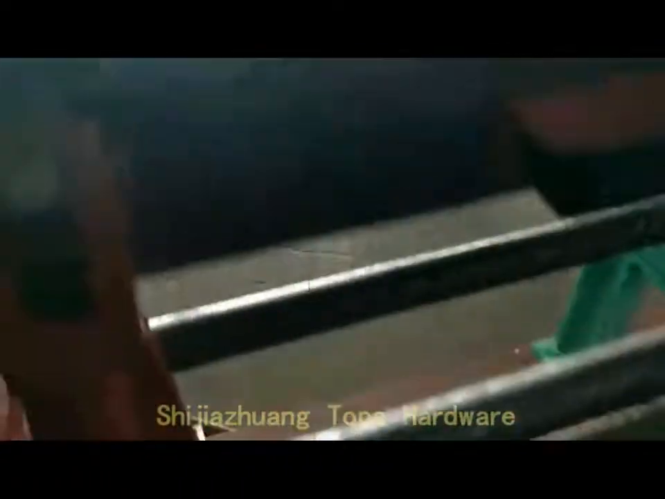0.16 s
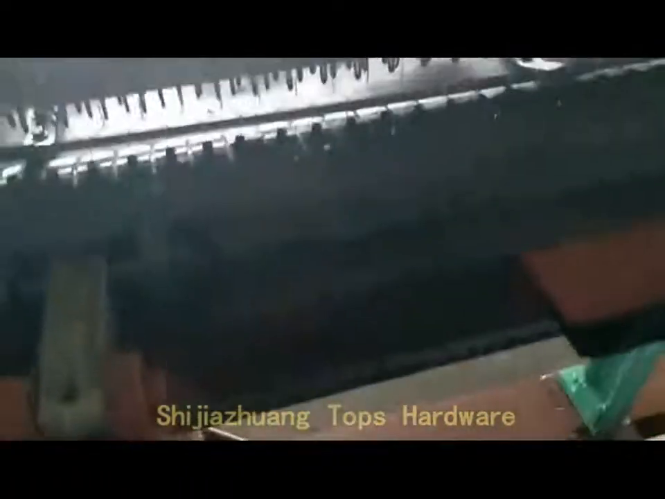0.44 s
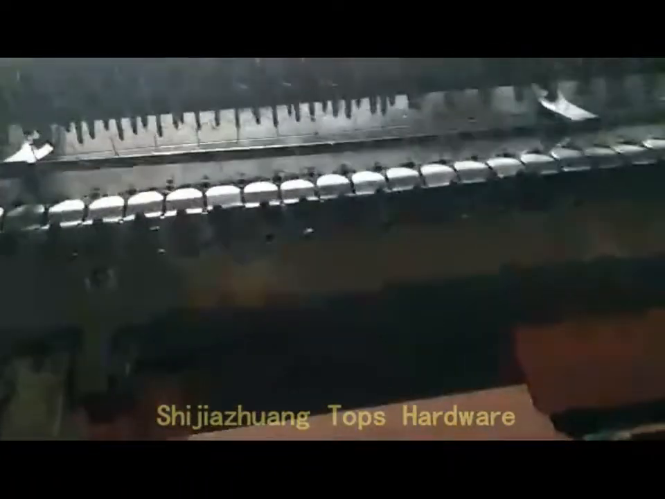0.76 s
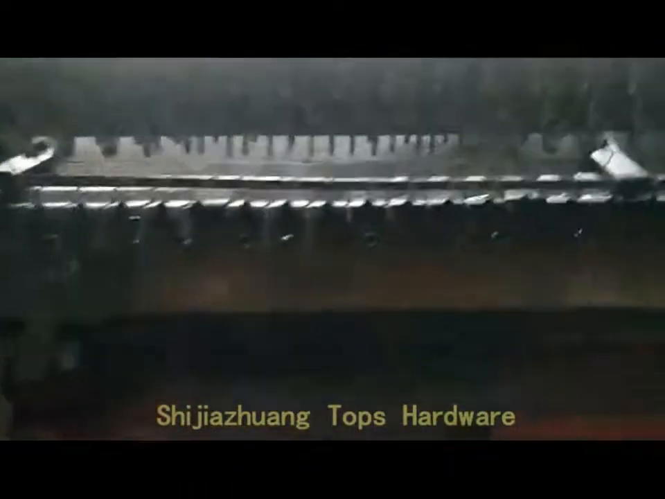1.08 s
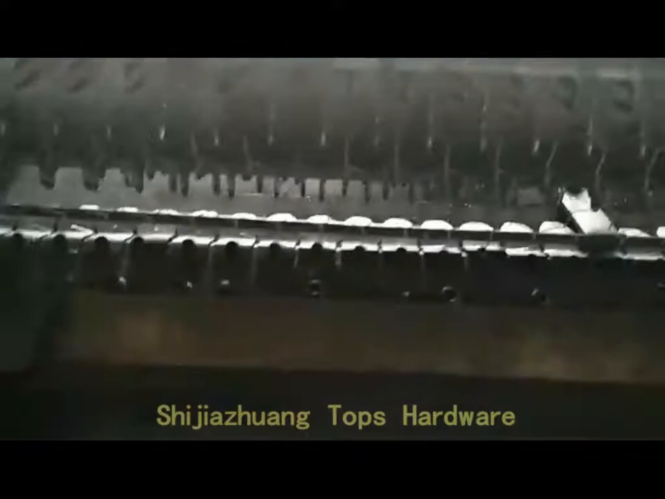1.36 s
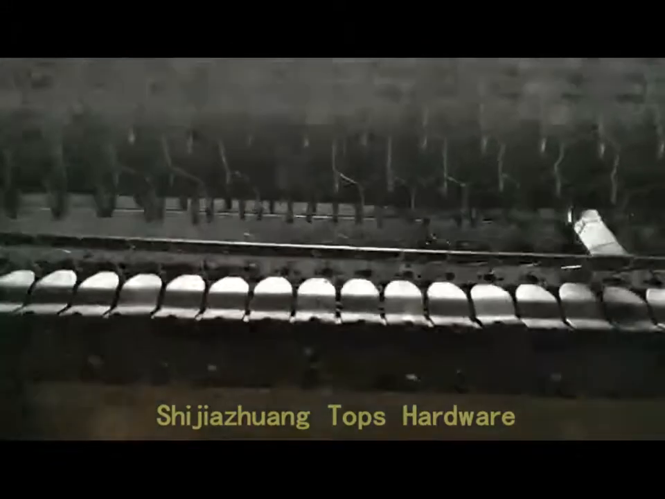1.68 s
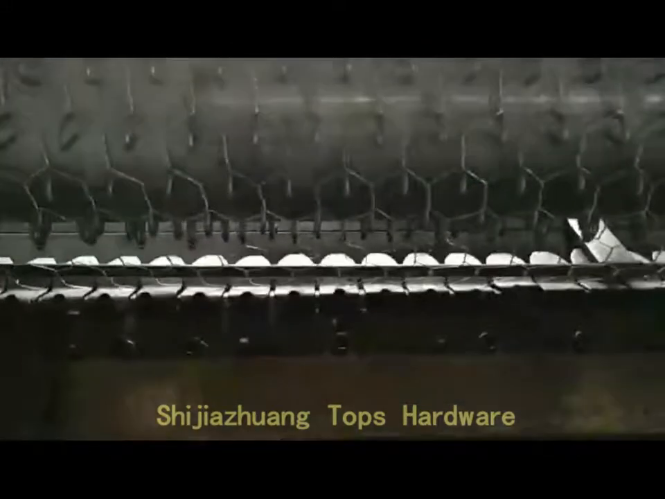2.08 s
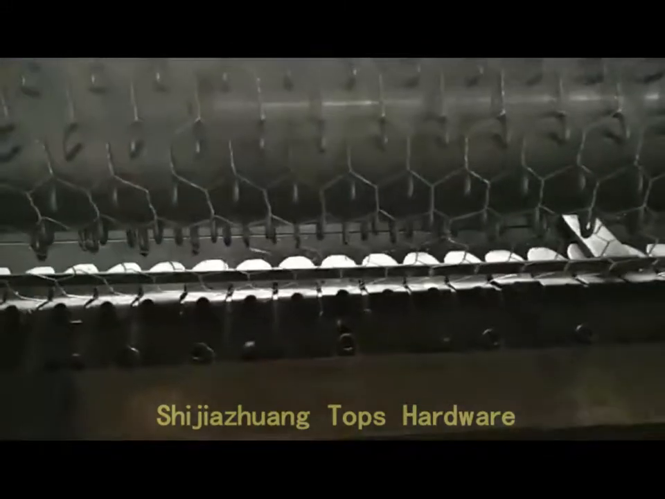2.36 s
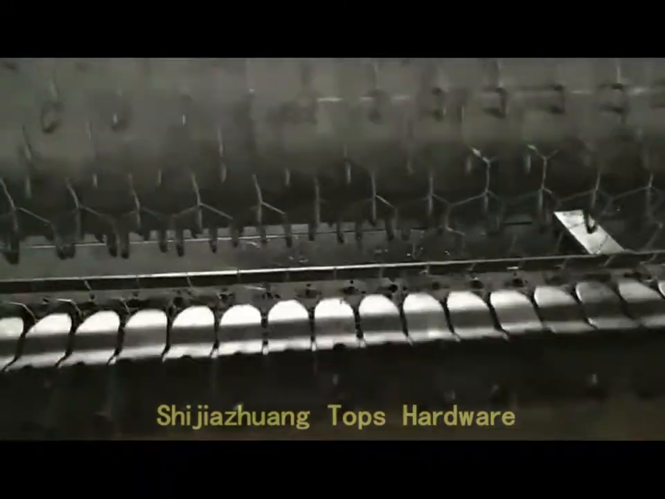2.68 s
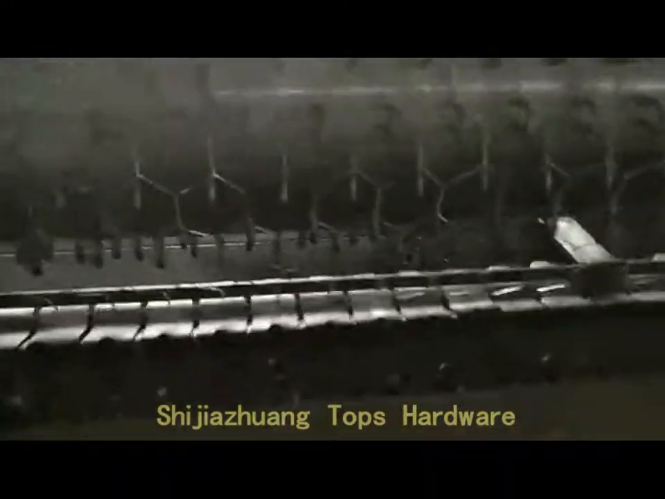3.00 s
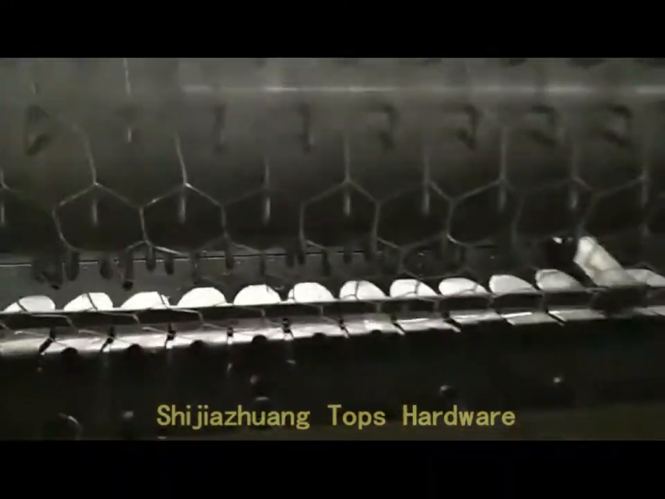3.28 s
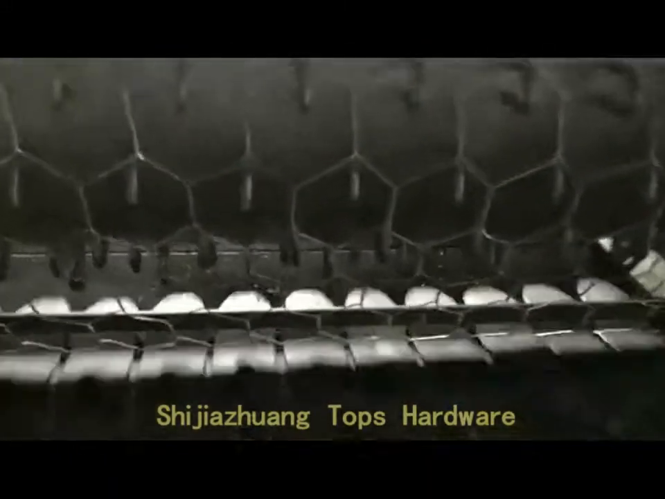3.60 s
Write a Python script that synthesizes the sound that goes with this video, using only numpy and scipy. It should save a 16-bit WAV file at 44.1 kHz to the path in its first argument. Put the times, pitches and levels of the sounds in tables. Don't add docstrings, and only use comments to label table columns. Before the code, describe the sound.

Wire netting machine clatters in rhythmic rounds, metal teeth rattling, a latch slamming over frame rumble

```python
import sys
import numpy as np
from scipy import signal
from scipy.io import wavfile

SR = 44100
rng = np.random.default_rng(int(sys.argv[2]) if len(sys.argv) > 2 else 0)


def volts(x):
    e = np.asarray(x, float) / 20
    return 10 ** e


def digitize_waveform(pressure):
    field = np.atleast_2d(pressure).T
    bounded = np.clip(field, -1, 1)
    quanta = np.round(bounded * 32767).astype(np.int16)
    wavfile.write(sys.argv[1], SR, quanta)


N = 164934

# (start [s], length [s], level at start [dB], level at end [dB], rack against teeth [dB])
STROKES = [(0.0, 0.097, -24, -20, 11), (0.118, 0.33, -13, -17, 3.5), (0.39, 0.13, -14, -16.5, 0),
           (0.612, 0.081, -20, -18, -0.5), (1.015, 0.044, -38, -25, -34), (1.148, 0.29, -15, -10.5, -1.5),
           (1.513, 0.18, -10, -32, -8), (1.656, 0.099, -18.5, -20, -5), (2.042, 0.077, -21.5, -9, -1),
           (2.18, 0.33, -14, -8.5, -1.5), (2.555, 0.23, -9.5, -19, -20), (2.729, 0.05, -11, -21, -3),
           (3.091, 0.071, -29.5, -11, -4), (3.238, 0.33, -14, -10.5, -3), (3.557, 0.089, -33, -10.5, -6)]
# (pitch [Hz], width [Hz], level [dB])
TEETH = [(4700, 130, -15), (4970, 390, 4), (5233, 110, -1), (5793, 510, 6.5), (6580, 1600, -10)]
# (pitch [Hz], width [Hz], level [dB])
RACK = [(1120, 520, -1), (1640, 170, -6), (1930, 240, 4.5), (2360, 144, -0.5), (2595, 260, -5.5)]
# (time [s], level [dB])
GUIDE = [(0, -11), (.4, -12), (1.3, -10.5), (2.0, -17.5), (3.74, -17)]
# (time [s], level [dB])
AIR = [(.65, -38), (.85, -31), (1.13, -27), (1.5, -35)]
# (time [s], peak level [dB], pitch [Hz])
SNAPS = [(0.1003, -7.5, 6200), (0.6553, -10.5, 4880), (0.7637, -22, 4450), (1.149, -11.5, 6050),
         (1.1603, -5, 5550), (1.1867, -6, 5740), (1.212, -10, 5730), (1.233, -17, 5560),
         (1.3667, -11, 4940), (1.434, -6, 5830), (1.6979, -10, 4800), (2.073, -12, 5900),
         (2.1905, -12, 4850), (2.2026, -3.5, 5070), (2.319, -5.5, 4970), (2.335, -9, 5160),
         (2.358, -6, 4950), (2.586, -11, 4570), (2.716, -10, 4900), (2.748, -5.5, 5010), (3.2367, -5, 5500),
         (3.2475, -4, 5770), (3.3005, -2.5, 5340), (3.3436, -9.5, 5200), (3.4729, -11.5, 5400),
         (3.5233, -7, 4680)]
# (time [s], peak level [dB])
CLICKS = [(0.1015, -16.5), (0.4, 9), (0.625, -13.5), (1.1533, -10), (1.164, -21), (1.4492, 1.5),
          (1.667, -13.5), (2.2, -12.5), (2.23, -14), (2.4948, 6.5), (2.7127, -23), (3.247, -8),
          (3.5416, 8.5)]
# (pitch [Hz], level [dB], time to fall 60 dB [s])
LATCH = [(3014, -19, 0.015), (6260, -12, 0.013), (7340, -34.5, 0.037), (9090, -13.5, 0.011),
         (9860, -23.5, 0.014), (12120, -6.5, 0.015), (13900, -28, 0.026)]
# (pitch [Hz], width [Hz], level [dB])
LOOSE = [(7430, 150, -4), (8280, 60, -7), (9010, 130, 0), (10100, 150, -9), (11250, 120, -9),
         (11900, 90, -3), (12220, 200, 1), (12900, 100, -9), (13400, 140, -9), (14200, 120, -10),
         (14700, 120, -11), (15250, 150, -12)]
# (time [s], peak level [dB], bass against knock [dB])
KNOCKS = [(0.105, -12, 13.5), (0.501, -19, 19), (0.604, -23, 16), (0.727, -20, -10), (1.147, -20.5, 20),
          (1.712, -23, 16), (1.74, -11, 0), (2.042, -21.5, 11), (2.189, -10.5, 13), (2.574, -16.5, 14),
          (2.784, -12.5, 8.5), (2.845, -14.5, 3), (3.235, -8, 5), (3.3, -19.5, 9), (3.63, -19, 16.5)]
# (pitch [Hz], level per Hz [dB])
KNOCK_COLOUR = [(450, 7.5), (800, -4), (1320, -4.5), (1800, 1), (4000, -25)]
# (time [s], level [dB])
LOAD = [(0, -22), (.35, -22.5), (.55, -20), (.74, -16.5), (.85, -27.5), (1.13, -28), (1.17, -19),
        (1.4, -21), (1.5, -26), (1.801, -18), (1.95, -25), (2.4, -24), (2.7, -18), (3.001, -26),
        (3.22, -25.5), (3.3, -22.5), (3.5, -22.5), (3.6, -23)]
# (pitch [Hz], level per Hz [dB])
RUMBLE_COLOUR = [(25, -56), (50, -5), (119, -3), (300, 0.5), (476, -13), (900, -20.5), (1050, -41),
                 (1500, -22)]
# (pitch [Hz], width [Hz], level [dB])
BEAMS = [(75, 15, -5), (152.8, 9, -5), (189.7, 11, 3), (202.3, 2.9, -11), (231.3, 14.3, -4), (303, 11, -1),
         (345.2, 16, 3.5), (410.7, 5.3, -3.5), (449.5, 37, -1), (795, 96, -1.5)]
# (start [s], length [s], level [dB])
GROANS = [
    (0.095, 0.13, -26.5),
    (1.159, 0.19, -20),
    (2.197, 0.2, -25.5),
    (3.24, 0.27, -18),
]
# (time [s], peak level [dB], pitch [Hz])
JOLTS = [(0.052, -11, 341), (0.107, -4, 314), (0.485, -8, 256), (0.85, -17.5, 186), (0.941, -14.5, 372),
         (1.038, -14.5, 344), (1.153, -6.5, 260), (1.216, -8.5, 168), (1.404, -13, 344), (1.821, -5.5, 346),
         (1.879, -16, 197), (1.916, -8.5, 211), (2.031, -8, 348), (2.085, -8.5, 362), (2.188, -4, 315),
         (2.439, -15, 240), (2.719, -7, 357), (2.782, -4, 321), (2.868, -8, 331), (3.057, -9.5, 202),
         (3.146, -14, 349), (3.24, -14.5, 321), (3.307, -7.5, 214), (3.395, -12, 237), (3.438, -12, 239),
         (3.628, -9, 257),
         (0.603, -13, 867),
    (3.635, -8.5, 568),
]
# (pitch [Hz], likeness [-1 to 1, limited])
LIKENESS = [(40, -0.5), (100, 2), (300, 1), (600, 0.2), (1200, -0.43), (5000, 0.2), (14000, -2)]
# (time [s], left against right [dB])
TURN = [(0, -2), (.4, -1), (.9, -2), (1.2, -1.5), (1.9, -3.5), (2.2, -1), (2.8, -4), (3.15, 2), (3.3, -2),
        (3.74, -1)]
# (time [s], zero swing left [full scale], zero swing right [full scale],
# gain duck left [dB], gain duck right [dB])
OVERLOADS = [
    (0.4, 0.27, 0.2, 2, 3.5),
    (1.45, 0.075, 0.63, 6, 10),
    (2.494, .05, 0.52, 5, 10),
    (3.543, 0.27, .01, 2.5, 2.5),
]


def rms_one(x):
    return x / np.sqrt(np.mean(x ** 2) + 1e-20)


def clock():
    return np.arange(N) / SR


def over_time(points):
    return np.interp(clock(), *np.transpose(points))


def at_hz(points, hz):
    return np.interp(np.log(hz), np.log(np.array(points)[:, 0]), np.array(points)[:, 1])


def drift(rate_hz):
    r = np.exp(-2 * np.pi * rate_hz * 40 / SR)
    steps = rng.standard_normal(N // 40 + 2002)
    slow = signal.lfilter([1], [1, -2 * r, r * r], steps)[2000:]
    return np.interp(np.arange(N) / 40, np.arange(len(slow)), rms_one(slow))


def high_pass(x, order, hz):
    return signal.sosfilt(signal.butter(order, hz, "high", fs=SR, output="sos"), x)


def resonate(x, hz, width_hz):
    r = np.exp(-np.pi * width_hz / SR)
    feedback = [1, -2 * r * np.cos(2 * np.pi * hz / SR), r * r]
    return signal.lfilter([(1 - r * r) / 2, 0, (r * r - 1) / 2], feedback, x + 1e-18)


def pair(source, hz):
    alike = np.clip(at_hz(LIKENESS, hz), -1, 1)
    return np.sqrt(1 + alike) * source[0] + np.sqrt(1 - alike) * source[1] * [[1], [-1]]


def coloured(spectrum, sources, patchy_db, rate_hz):
    lowest, highest = spectrum[0][0], spectrum[-1][0]
    edges = lowest * 2 ** np.arange(0, np.log2(highest / lowest) + .2, 1 / 3)
    out = 0
    for k, (low, high) in enumerate(zip(edges, edges[1:])):
        hz = np.sqrt(low * high)
        band_filter = signal.butter(2, [low, high], "band", fs=SR, output="sos")
        band = signal.sosfilt(band_filter, sources[k % 2])
        level = volts(at_hz(spectrum, hz) + patchy_db * drift(rate_hz))
        out = out + level * pair(band, hz)
    return rms_one(out)


def body(table, sources, patchy_db, rate_hz):
    out = 0
    for k, (hz, width_hz, db) in enumerate(table):
        tone = rms_one(pair(resonate(sources[k % 2], hz, width_hz), hz))
        out = out + (-1) ** k * volts(db + patchy_db * drift(rate_hz)) * tone
    return rms_one(out)


def dying(hits, t60_s):
    kicks = np.zeros(N)
    for s, db in hits:
        kicks[int(s * SR)] += volts(2 * db)
    return np.sqrt(signal.lfilter([1], [1, -volts(-120 / (t60_s * SR))], kicks))


def contacts():
    shape, clicks_per_s = (2, 2, N), 2500
    sizes = volts(0.5 * np.minimum(rng.exponential(1, shape), 5))
    happens = rng.random(shape) < clicks_per_s / SR
    clicks = sizes * rng.choice([-1, 1], shape) * happens
    return rms_one(clicks) + .5 * rng.standard_normal(shape)


def gears():
    rise_s, fall_db_per_s, idle_db = 0.0058, 119, -29
    sizzle_fade_db_per_s, teeth_edge_hz = 42, 6640
    t = clock()
    teeth, rack, fresh = volts(2 * idle_db), volts(2 * idle_db), volts(2 * over_time(AIR))
    for s, length, start_db, end_db, rack_db in STROKES:
        fall_db = fall_db_per_s * np.maximum(t - s - length, 0)
        db = np.interp(t, [s, s + length], [start_db, end_db]) - fall_db
        power = volts(2 * db) * np.clip((t - s) / rise_s, 0, 1) ** 2
        teeth = teeth + power
        rack = rack + power * volts(2 * rack_db)
        fade_db = sizzle_fade_db_per_s * np.maximum(t - s, 0) + fall_db
        fresh = fresh + power * volts(-2 * fade_db)
    chatter, hits = volts(1.02 * drift(23)), contacts()
    ringing = volts(-5.5) * np.sqrt(teeth) * body(TEETH, hits, patchy_db=3.5, rate_hz=6.5)
    ringing += volts(-11.5) * np.sqrt(rack) * body(RACK, hits[::-1], patchy_db=2.0, rate_hz=14)
    guide_hz = 4020
    guide = rms_one(pair(resonate(hits[0], guide_hz, width_hz=460), guide_hz))
    ringing += volts(over_time(GUIDE) + 0.5 * drift(36)) * np.sqrt(rack) * guide
    ringing = signal.sosfilt(signal.butter(10, teeth_edge_hz, fs=SR, output="sos"), ringing)
    sizzle = rms_one(high_pass(hits[0, ::-1], 6, teeth_edge_hz))
    sizzle = volts(-15 + 0.5 * drift(7.3)) * np.sqrt(fresh) * sizzle
    return chatter * (ringing + sizzle)


def snaps():
    peak_s, width_hz = 0.0042, 690
    out, t = np.zeros((2, N)), np.arange(int(.03 * SR)) / SR
    shape = np.sqrt(t / peak_s) * np.exp(.5 - (t / peak_s) ** 2 / 2)
    for s, db, hz in SNAPS:
        noise = rng.standard_normal((2, 2, len(t)))
        tone = rms_one(resonate(resonate(noise[0], hz, width_hz), hz, width_hz))
        edge = volts(-17) * np.diff(noise[1], prepend=0)
        at = int(s * SR)
        out[:, at:at + len(t)] += volts(db - 6.5) * shape * (tone + edge)
    return out


def latch_ring(pan_db):
    bounce_s, bounce_db, contact_s = 0.015, -12, 0.0031
    s, db = np.transpose(CLICKS)
    at = (s * SR).astype(int)
    again = np.array([int((row[0] + bounce_s) * SR) for row in OVERLOADS])
    side = volts(np.outer([.5, -.5], pan_db + rng.normal(0, 14, len(s))))
    luck_db = rng.normal(0, 2.15, (len(s), len(LATCH)))
    step, out = np.arange(int(contact_s * SR)), np.zeros((2, N))
    for k, (hz, level_db, t60_s) in enumerate(LATCH):
        clicks = np.zeros((2, N))
        clicks[:, at] = side * volts(db + level_db + luck_db[:, k])
        bounce = volts(bounce_db + level_db + 8.0 + luck_db[:len(again), -k])
        clicks[:, again] = (hz > 8000) * bounce
        r, w = volts(-60 / (t60_s * SR)), 2 * np.pi * hz / SR
        swelling = signal.lfilter(np.cos(w * step) * 2 / len(step), [1], clicks)
        out += signal.lfilter([0, np.sin(w)], [1, -2 * r * np.cos(w), r * r], swelling + 1e-18)
    return out


def latch_crack(noise):
    loudness = signal.lfilter([.03], [1, -.97], dying(CLICKS, 7 * 0.0026))
    return volts(-4.5) * loudness * high_pass(noise[::-1], 2, 1500)


def loose_parts(noise):
    tail = high_pass(noise, 4, 6800) * volts(-21)
    for hz, width_hz, level_db in LOOSE:
        tail += volts(level_db - 15 + 3.5 * drift(18)) * rms_one(resonate(noise, hz, width_hz))
    swell_s = 0.033
    lag = np.exp(-1 / (swell_s * SR))
    swell = signal.lfilter([1 - lag], [1, -lag], dying(CLICKS, t60_s=0.38))
    return volts(-14 + 2.7 * drift(34)) * swell * tail


def latch():
    pan_db = -3.5
    noise = rng.standard_normal((2, N))
    side = volts([[pan_db / 2], [-pan_db / 2]])
    return latch_ring(pan_db) + side * (latch_crack(noise) + loose_parts(noise))


def knocks(noise):
    hits = [row[:2] for row in KNOCKS]
    loudness = dying(hits, t60_s=0.31) + 2 * dying(hits, t60_s=.03)
    return volts(-9.5) * loudness * coloured(KNOCK_COLOUR, noise, patchy_db=-1.0, rate_hz=15)


def groans():
    start_hz, sag_hz_per_s, wobble_hz = 284.8, 340, 25.2
    t, out = clock(), 0
    for s, length, db in GROANS:
        phase = 2 * np.pi * (start_hz * t - sag_hz_per_s * (t - s) ** 2 / 2)
        shape = np.clip(np.minimum((t - s) / 0.0033, (s + length - t) / 0.01), 0, 1)
        rough = drift(wobble_hz) * np.cos(phase) + drift(wobble_hz) * np.sin(phase)
        out = out + volts(db) * shape * rough
    return out


def jolts():
    rise_s = 0.011
    out, t = np.zeros(N), np.arange(int(.1 * SR)) / SR
    shape = t / rise_s * np.exp(1 - t / rise_s)
    for s, db, hz in JOLTS:
        at = int(s * SR)
        wave = np.sin(2 * np.pi * (hz * t + rng.random()))
        out[at:at + len(t)] += volts(db - 8) * shape * wave
    return out


def frame():
    noise = rng.standard_normal((2, 2, N))
    load = volts(over_time(LOAD) + 1.58 * drift(31))
    thud = dying([(s, db + bass_db - 12.0) for s, db, bass_db in KNOCKS], t60_s=0.45)
    thud = signal.lfilter([.006], [1, -.994], thud)
    rumble = volts(-2.5) * load * coloured(RUMBLE_COLOUR, noise[::-1], patchy_db=0.0, rate_hz=19)
    beams = volts(-1.5) * np.hypot(load, thud) * body(BEAMS, noise, patchy_db=2, rate_hz=9.0)
    return rumble + groans() + jolts() + beams + knocks(noise)


def hall(x):
    t60_s = 0.63
    t = np.arange(SR) / SR
    tail = rng.standard_normal((2, SR)) * volts(-60 * t / t60_s) * (t > .012)
    tail = signal.lfilter([1, -1], np.convolve([1, -.75], [1, -.97]), tail)
    tail = tail / np.sqrt(np.sum(tail ** 2, axis=1, keepdims=True))
    return signal.fftconvolve(x, tail, axes=1)[:, :N]


def scene():
    turn_db = over_time(TURN) * [[.5], [-.5]]
    dry = (gears() + snaps()) * volts(turn_db) + latch()
    dry = dry + frame() * volts(0.33 * turn_db + [[-.3], [.3]])
    return dry + volts(-17.5) * hall(dry)


def band_limit(x):
    return signal.sosfilt(signal.butter(12, 15940, fs=SR, output="sos"), x)


def record(dry):
    swing_back_s, rebound, rebound_s = 0.031, 0.45, .13
    duck_hold_s, duck_ease_s = 0.11, 0.033
    duck_db, zero = np.zeros((2, N)), np.zeros((2, N))
    for s, left, right, left_db, right_db in OVERLOADS:
        t = np.maximum(clock() - s, 0)
        onset = 1 - np.exp(-t / 0.0031)
        release = 1 + np.exp(np.minimum((t - duck_hold_s) / duck_ease_s, 50))
        duck_db += np.outer([left_db, right_db], onset / release)
        back = rebound * (t / rebound_s) ** 2 * np.exp(2 - 2 * t / rebound_s)
        swing = back - np.exp(-t / swing_back_s)
        zero += np.outer([left, right], onset * swing)
    mix = np.clip(dry * volts(-duck_db) + zero, -1, 1)
    mix = signal.sosfilt(signal.cheby2(12, 70, 16600, fs=SR, output="sos"), mix)
    return band_limit(mix)


dry = scene()
out = record(dry)
digitize_waveform(out)
```